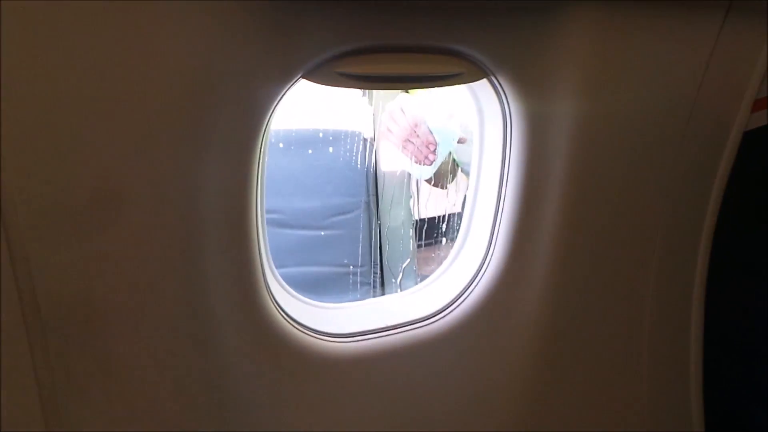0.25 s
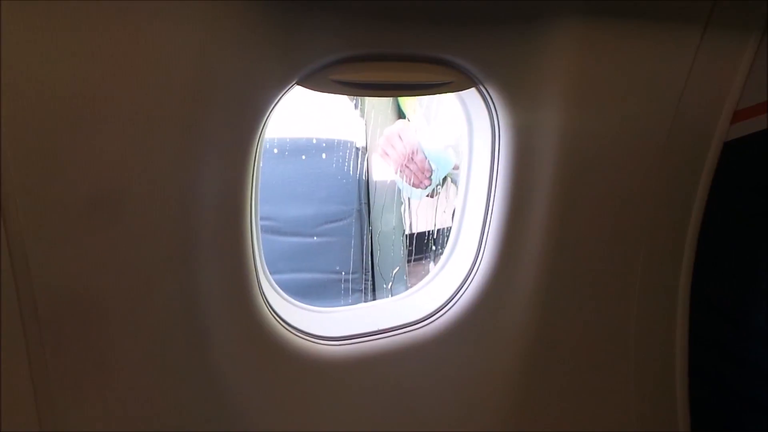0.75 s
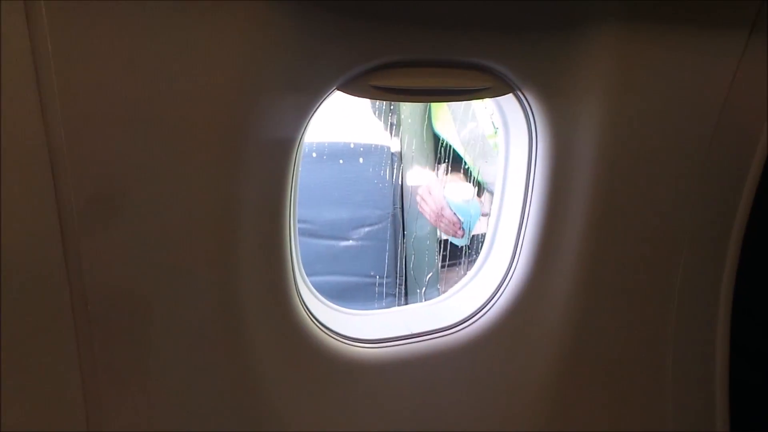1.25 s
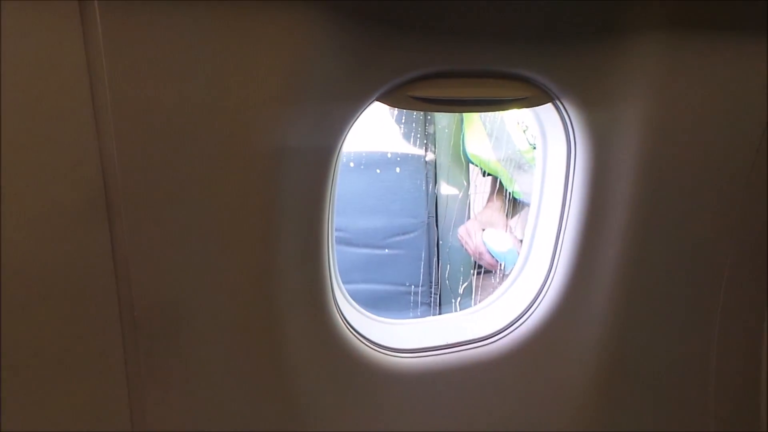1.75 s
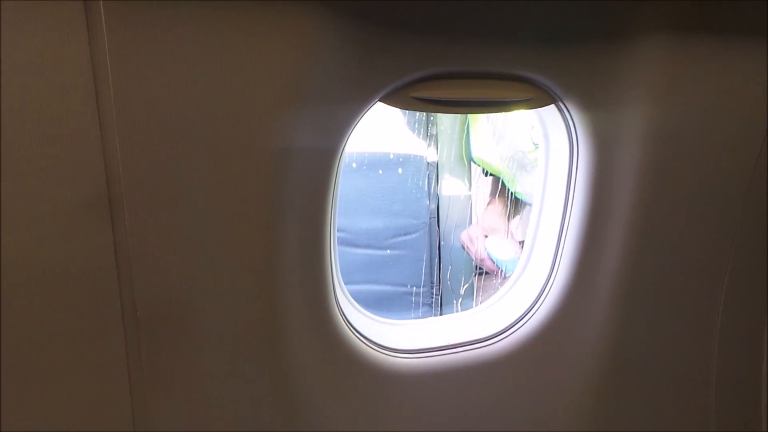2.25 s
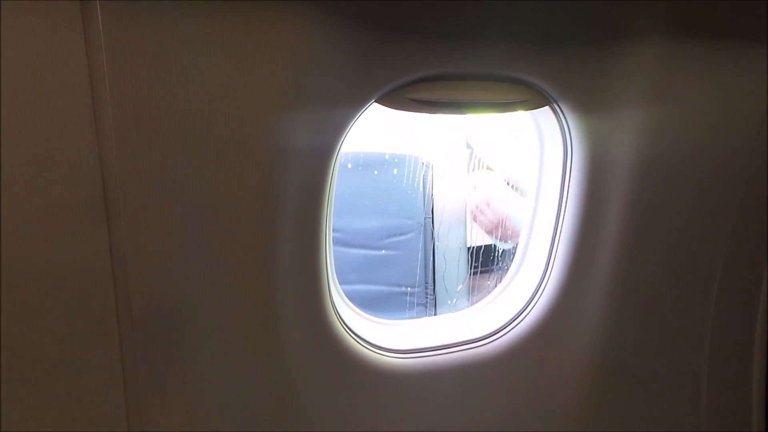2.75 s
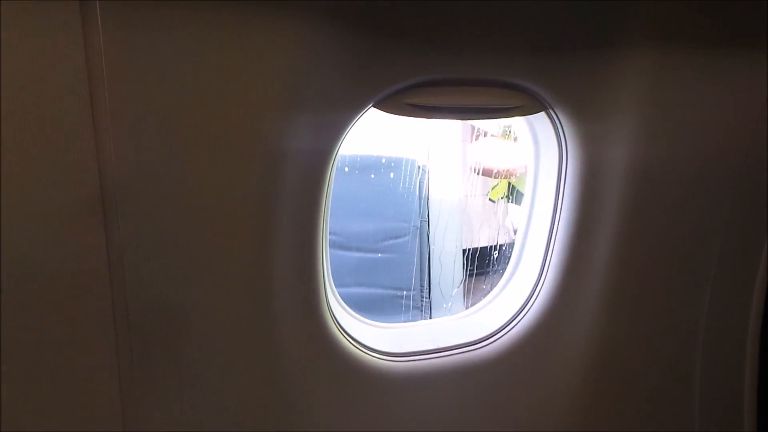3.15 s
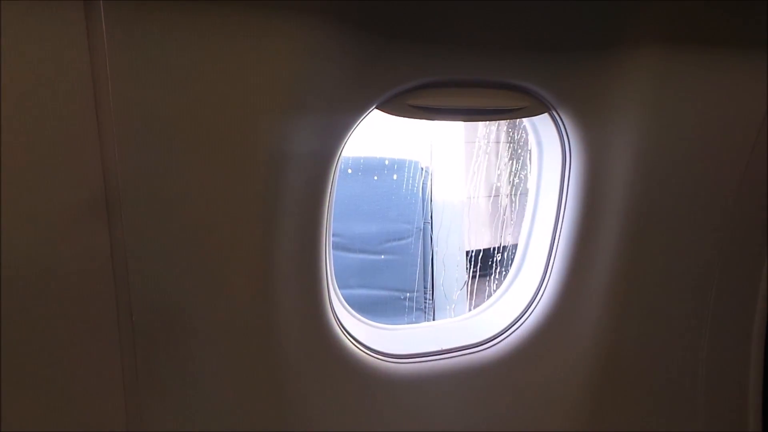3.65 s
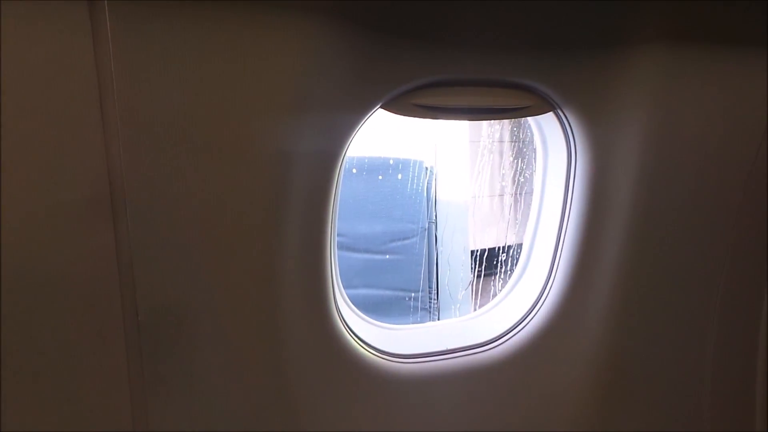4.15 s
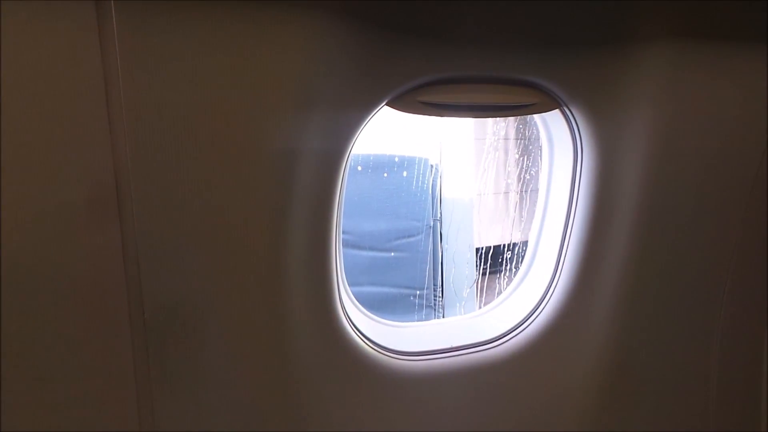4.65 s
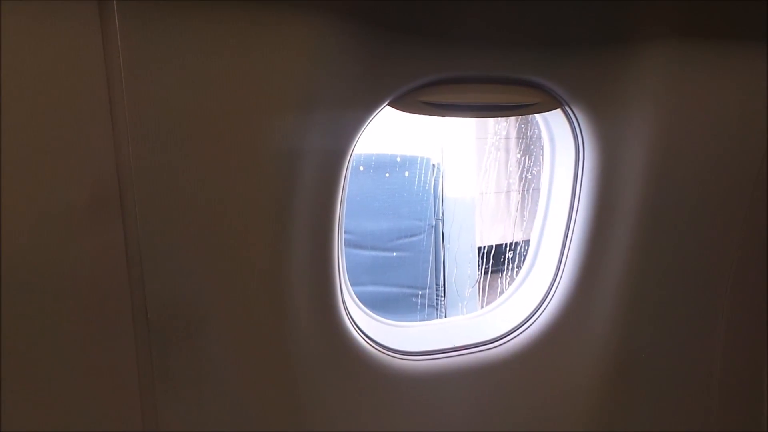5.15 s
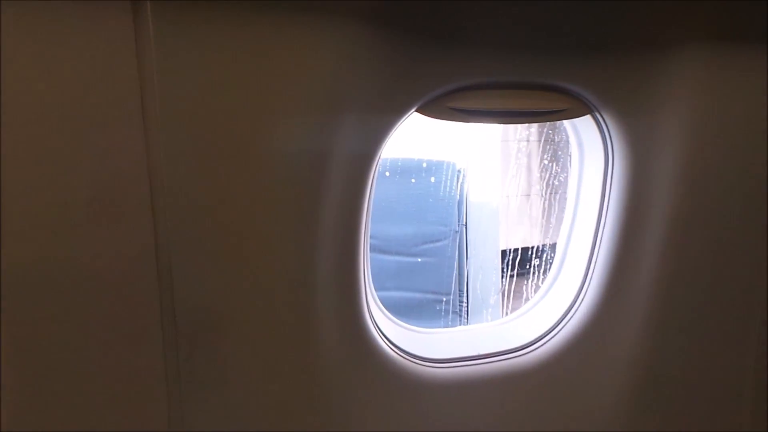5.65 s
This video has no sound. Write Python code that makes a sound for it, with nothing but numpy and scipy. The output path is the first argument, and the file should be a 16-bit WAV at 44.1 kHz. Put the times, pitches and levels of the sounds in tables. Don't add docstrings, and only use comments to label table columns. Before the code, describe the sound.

Rushing cabin ventilation with a constant low tone, broken by a few short hard clicks, ending with a snap and heavy thud.

```python
import sys
import numpy as np
from scipy import signal
from scipy.fft import rfft, irfft
from scipy.io import wavfile
from scipy.ndimage import uniform_filter1d

SR = 44100
rng = np.random.default_rng(int(sys.argv[2]) if len(sys.argv) > 2 else 0)


def nominal_scale(level):
    x = np.asarray(level, float) / 20
    return 10 ** x


def unload_wav(signal):
    wavfile.write(
        sys.argv[1],
        SR,
        np.round(np.clip(np.atleast_2d(signal).T, -1, 1) * 32767).astype(np.int16),
    )


N = 260631


def rms_one(x):
    return x / np.sqrt(np.mean(x ** 2) + 1e-20)


def bin_hz(size):
    return np.arange(size // 2 + 1) * SR / size


def from_middle():
    return (np.arange(N) - N / 2) / SR


def shaped(x, gain):
    return irfft(rfft(x) * gain, len(x))


def colour_db(spectrum, size):
    hz, level_db = np.transpose(spectrum)
    return np.interp(np.log(bin_hz(size) + 1e-3), np.log(hz), level_db)


def resonances_db(hz, modes):
    return sum(level_db / (1 + (2 * (hz - centre) / width) ** 2) for centre, width, level_db in modes)


def turbulence(spectrum, modes):
    level_db = colour_db(spectrum, N) + resonances_db(bin_hz(N), modes)
    return rms_one(shaped(rng.standard_normal(N), nominal_scale(level_db)))


def ventilation():
    # (frequency [Hz], density [dB per Hz])
    rumble = [(13, -51), (22, -28.5), (65, 0), (97, -7), (124, -3), (156, -9), (161, -10), (170, -7.5),
              (220, -34), (370, -120)]
    # (frequency [Hz], density [dB per Hz])
    rush = [(130, -17), (215, -4.5), (227, -5), (295, -10.5), (501, -15), (652, -17.5), (700, -17.5),
            (945, -24), (1690, -28), (2820, -30), (3190, -36), (3540, -32.5), (5220, -38.5), (10400, -41),
            (14500, -51.5)]
    # (frequency [Hz], width [Hz], level [dB])
    ducts = [(257, 10, 3.5), (485, 40, 3), (701, 42, 3), (805, 36, 3), (2680, 820, -0.5), (4100, 600, -1),
             (14100, 2800, 8)]
    # (time [s], level [dB], half width [s])
    swells = [
        (.25, 2.5, .12),
        (2.2, 4, .18),
        (3.4, 2.5, .15),
        (5.48, 3, .1),
    ]
    t = np.arange(N) / SR
    swell_db = sum(level_db * np.exp(-((t - s) / width) ** 2) for s, level_db, width in swells)
    flow = nominal_scale(-35.2 + swell_db) * turbulence(rumble, [])
    return flow + nominal_scale(-34.7 + 0.08 * swell_db) * turbulence(rush, ducts)


def blower():
    blade_hz, middle_db, fade_db_per_s = 194.5, -28.5, -0.3
    t = from_middle()
    return np.sqrt(2) * nominal_scale(middle_db + fade_db_per_s * t) * np.sin(2 * np.pi * blade_hz * t)


def motor():
    line_hz = [73.4, 121.2, 2455, 2676.4, 2750, 2824.7, 2870, 2897, 6473.4, 6622]
    # (level midway [dB], drift [dB/s], width [Hz], steady share [0-1])
    lines = [(-38, -.3, 4.1, .4), (-44, -.3, 6.0, .3), (-64, .1, 30.0, .1), (-66, 1.2, 3.0, .6),
             (-62, -1.8, 1.5, .7), (-65, .1, 1.5, .7), (-69, .1, 2.7, .5), (-65, .1, 3.3, .6),
             (-66, -.4, 3.0, .4), (-70, .3, 15, .2)]
    out, bins, t = np.zeros(N), bin_hz(N), from_middle()
    for hz, (level_db, drift, width, steady) in zip(line_hz, lines):
        resonance = 1 / (1 + (2 * (bins - hz) / width) ** 2)
        wavering = rms_one(shaped(rng.standard_normal(N), resonance))
        steady = np.clip(steady, 0, 1)
        tone = np.sqrt(2 * steady) * np.sin(2 * np.pi * hz * t)
        out += nominal_scale(level_db + drift * t) * (np.sqrt(1 - steady) * wavering + tone)
    return out


def snaps():
    # (time [s], rms level [dB], colour index)
    breaks = [
        (.6825, -18.5, 0),
        (2.533, -51, 3),
        (2.723, -51, 3),
        (3.3991, -25, 2),
        (3.728, -45.5, 2),
        (4.806, -34.5, 3),
        (5.570, -27.5, 4),
        (5.6655, -12, 1),
        (5.822, -46, 3),
    ]
    # (frequency [Hz], density [dB per Hz])
    knock = [(160, -22), (280, -4.5), (444, -8), (573, 0.5), (727, -10), (999, -5), (1530, -14.5),
             (2430, -19.5), (3340, -31), (3560, -41), (4590, -36), (7050, -44), (11400, -44), (12500, -43),
             (16200, -78), (22000, -120)]
    thud = [(170, -44), (290, -7.5), (540, -2), (942, -5), (1200, -14), (1490, -13), (1640, -24),
            (1840, -14), (2030, -26), (2520, -26.5), (2780, -18.5), (3490, -30.5), (3980, -26), (7910, -32),
            (14500, -38)]
    crack = [(500, -47), (850, -9), (1330, -12), (1770, -3.5), (1950, -12), (2560, -11.5), (3330, -18),
             (3980, -14), (5290, -23.5), (6020, -15.5), (9690, -23.5), (10500, -18), (14500, -34)]
    tick = [(820, -28), (1400, 0), (1560, -5), (2070, 1), (2620, -1), (2940, -4), (3550, -9), (5560, -3.5),
            (9070, -4.5), (14500, -19)]
    snap = [(500, -31.5), (850, -7), (946, -1), (1100, -18), (1330, -6), (1840, -11), (2000, -22),
            (2420, -4), (3370, -8), (4220, -11), (5540, -12), (6020, -13), (6700, -13), (10800, -17),
            (14500, -41)]
    colours = [knock, thud, crack, tick, snap]
    # (frequency [Hz], level over the reflections [dB], T60 [s])
    rings = [
        [(355, -8, 0.13), (556, -4, 0.16), (623, -5, .15), (943, -4, 0.13), (1013, 2.5, 0.11),
         (1382, -10, 0.092)],
        [(303, -4, 0.17), (393, -8, .12), (452, -2, .11), (498, 2.5, 0.11), (593, -4, 0.17), (686, -4, 0.13),
         (800, -5, .13), (994, -9, 0.11), (1150, -12, .1), (1460, -17.5, .12), (1850, -12.5, 0.079)],
        [(1005, -6, 0.15), (1500, -3, 0.09), (1570, -6, .08), (1800, -7, .1), (2400, -11, 0.088),
         (4100, -11, .08)],
        [(2070, -7, .08)],
        [(1350, -5, 0.17), (2420, -10, .1), (4200, -7, .08), (5940, -5, 0.069)],
    ]
    crossover_hz = [900, 3500]
    cabin_t60_s = [0.15, 0.185, 0.22]
    build_s = [0.0025, 0.0012, .0007]
    body_echo_db = -4
    size = 16384
    t, hz, out = np.arange(size) / SR, bin_hz(size), np.zeros(N + size)
    low, below_treble = [1 / (1 + (hz / edge) ** 4) for edge in crossover_hz]
    ranges = [low * nominal_scale(body_echo_db), below_treble - low, 1 - below_treble]
    for s, level_db, index in breaks:
        kind, at = int(round(index)), round(s * SR)
        hold = 0.017 + 0.00025 * level_db
        after_hold = np.maximum(t - hold, 0)
        echo = rms_one(shaped(rng.standard_normal(size), nominal_scale(colour_db(colours[kind], size))))
        echo = echo / np.sqrt(uniform_filter1d(echo ** 2, size=300))
        for part, t60, build in zip(ranges, cabin_t60_s, build_s):
            envelope = (1 - np.exp(-t / build)) * nominal_scale(level_db - 60 * after_hold / t60)
            out[at:at + size] += shaped(echo, part) * envelope
        for mode_hz, mode_db, t60 in rings[kind]:
            decay = nominal_scale(level_db + mode_db - 1.5 - 60 * after_hold / t60)
            swell = (1 - np.exp(-t / 0.0021)) * decay
            out[at:at + size] += swell * np.sin(2 * np.pi * mode_hz * t)
    return out[:N]


def pricks():
    # (time [s], peak level [dB])
    clicks = [
        (2.5005, -35),
        (2.534, -27),
        (4.808, -30),
    ]
    ring_hz, t60_s = 2500, 0.0009
    out, t = np.zeros(N), np.arange(400) / SR
    for s, level_db in clicks:
        at = round(s * SR)
        out[at:at + len(t)] += nominal_scale(level_db - 60 * t / t60_s) * np.cos(2 * np.pi * ring_hz * t)
    return out


def scene():
    return (ventilation() + blower() + motor() + snaps() + pricks())[None]


def sparse_top(x):
    # (frequency [Hz], share)
    keep_above = [(7000, .1), (9600, .65), (11000, 1.2), (12300, 1.7), (13800, 2.15), (14500, 2.4),
                  (14800, 6)]
    masking = 0.8
    padded = np.pad(x[0], (511, 0))
    hz, _, bins = signal.stft(padded, SR, nperseg=2048, noverlap=1024)
    size = abs(bins)
    treble = size[hz > 5000].mean(axis=0)
    treble = np.minimum(treble, np.roll(treble, 2))
    bar = np.interp(hz, *np.transpose(keep_above), left=0) * np.median(size, axis=1)
    weak = size < np.outer(bar, (treble / np.median(treble)) ** masking)
    lost = signal.istft(bins * weak, SR, nperseg=2048, noverlap=1024)[1]
    return x - lost[511:511 + N]


def starve(x):
    starved = [.119, .741, .953, 1.272, 1.551, 2.084, 2.485, 3.108, 3.769, 4.068, 4.472, 4.515, 5.454]
    from_hz, spread_hz = 2800, 700
    spared = 0.4
    out, half = x.copy(), 780
    hz = bin_hz(2 * half)
    band = (hz // 220).astype(int)
    for s in starved:
        draw = rng.random(101)
        at = round(s * SR)
        part = slice(at - half, at + half)
        above_edge = hz > from_hz + spread_hz * draw[0] ** 2
        lost = above_edge * (draw[band] >= spared * from_hz / (hz + 1))
        removed = shaped(x[0, part], (hz > from_hz) * (1.4 * lost - 0.4))
        out[0, part] -= 0.92 * np.hanning(2 * half) * removed
    return out


def roll_off(x):
    return signal.sosfilt(signal.butter(12, 15000, fs=SR, output="sos"), x)


def record(dry):
    cut = shaped(dry[0], bin_hz(N) < 14900)[None]
    mix = starve(sparse_top(cut))
    return roll_off(mix)


dry = scene()
out = record(dry)
unload_wav(out)
```